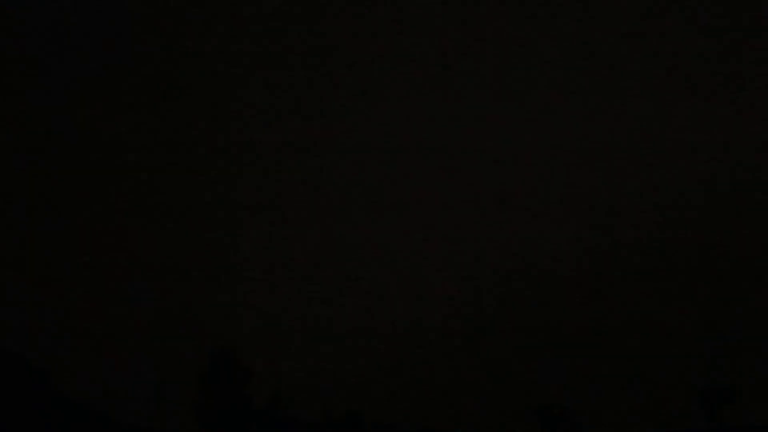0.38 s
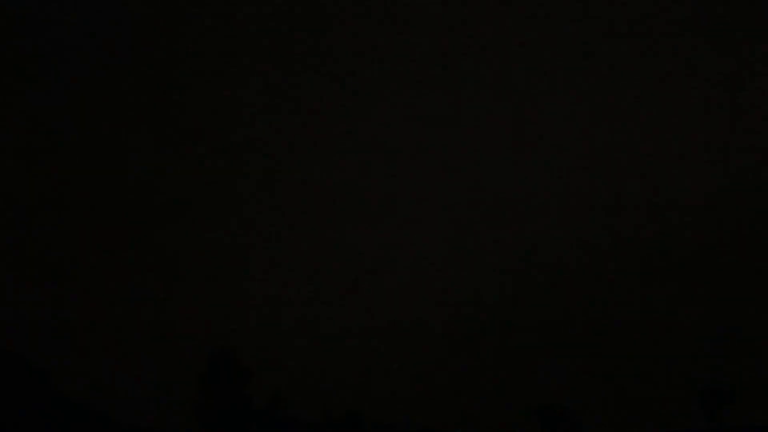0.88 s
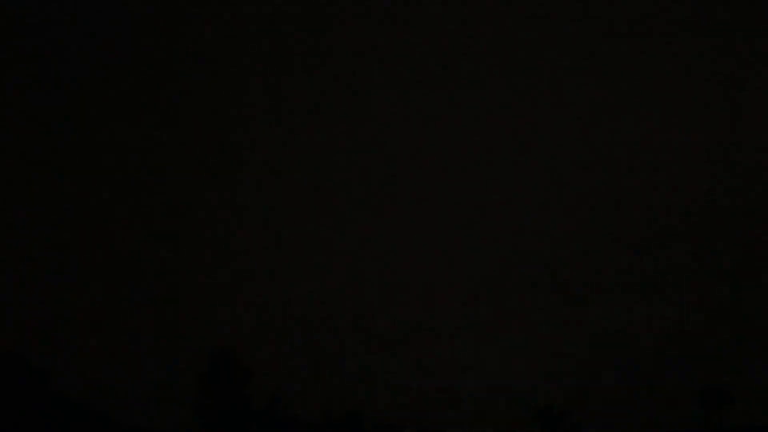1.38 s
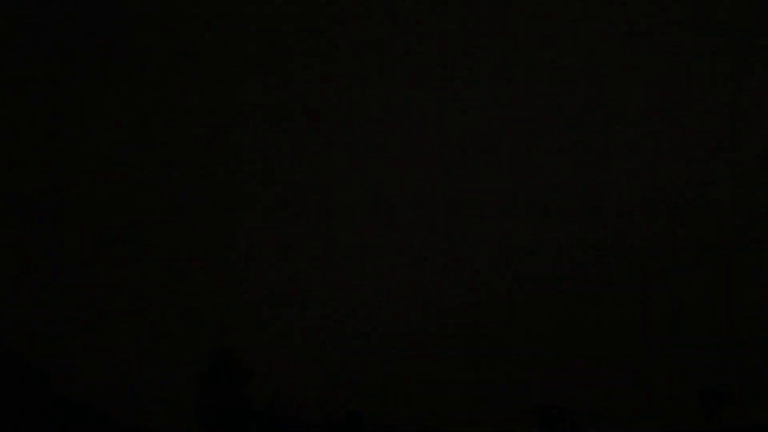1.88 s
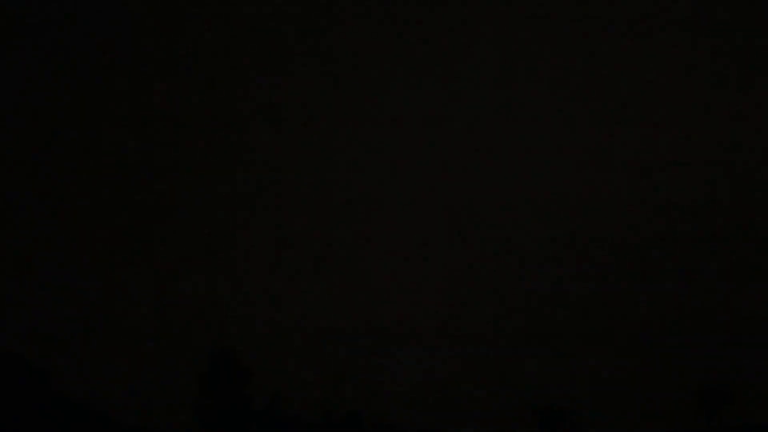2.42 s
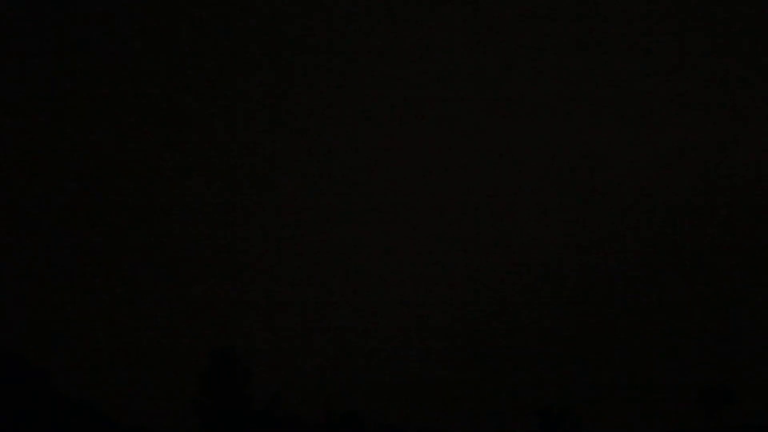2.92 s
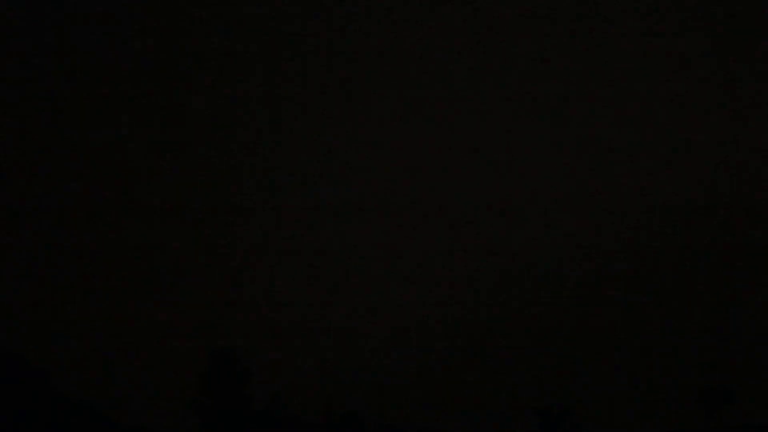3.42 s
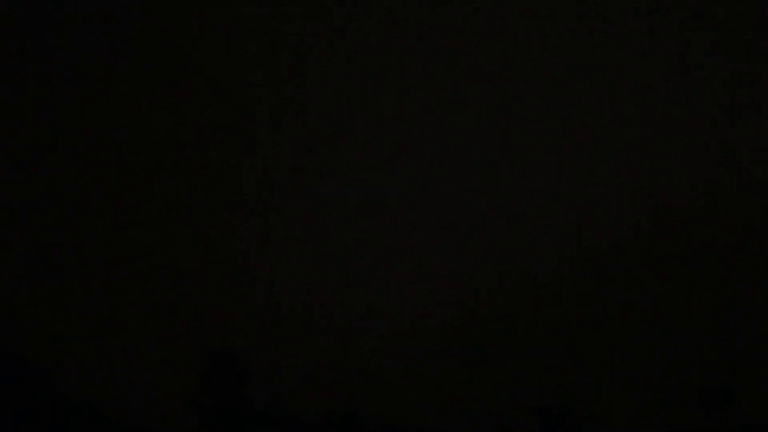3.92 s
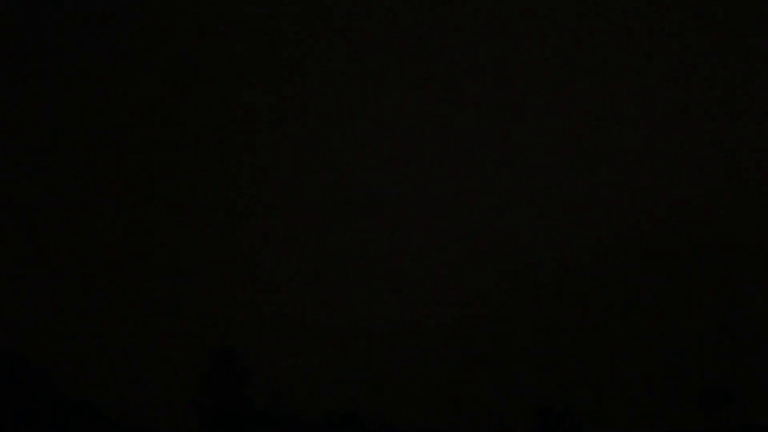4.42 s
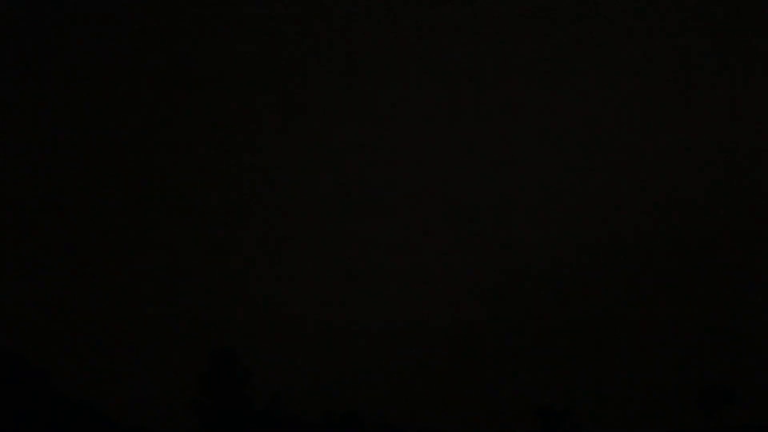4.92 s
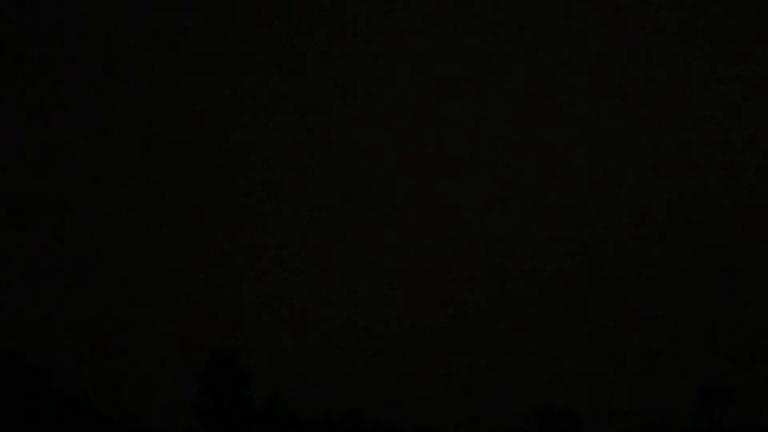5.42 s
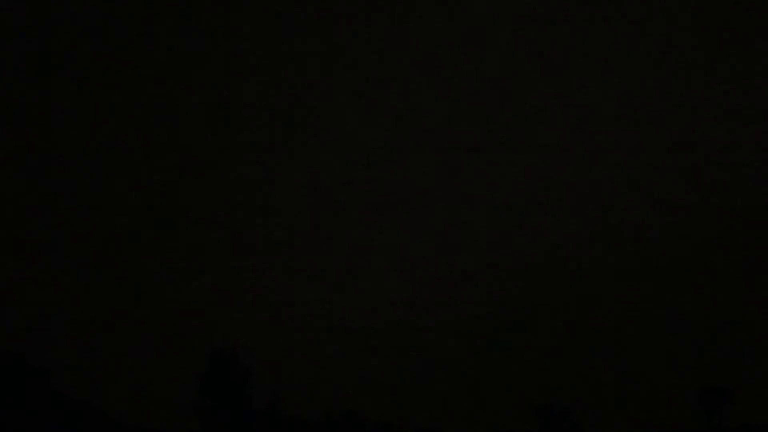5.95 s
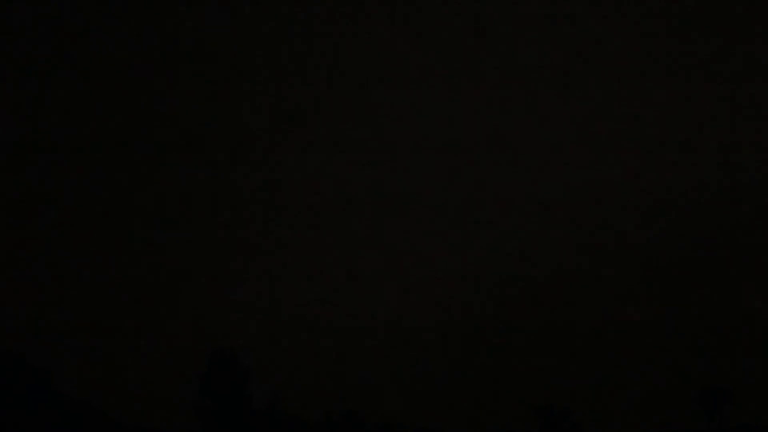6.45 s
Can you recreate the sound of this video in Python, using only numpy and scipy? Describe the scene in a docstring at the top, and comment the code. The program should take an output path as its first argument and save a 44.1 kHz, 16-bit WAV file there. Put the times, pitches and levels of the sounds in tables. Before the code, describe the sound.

Outdoors at night near a road, a cricket chirps close by in fast, almost unbroken pulses with a fainter insect trill above. One engine hums low and steady; another idles, revs up and fades by three seconds. Early on, a dozen soft distant booms tumble together over a low roll. Far traffic rumbles throughout, heard from one fixed mono microphone.

```python
"""A night outdoors near a road. From the start one engine cruises while another idles, pulls away and fades,
both as harmonic orders of the cycle rate, over far traffic and night air made of filtered noise.
A cricket chirps close by in gliding wing strokes and a second insect trills above it.
Soon faint tones begin to glide and a cluster of distant booms, each a push and a suction, rolls in.
The engine left cruising, the traffic and the insects go on to the end, with one more faint glide late on."""
import sys
import numpy as np
from scipy import signal
from scipy.fft import rfft, irfft
from scipy.io import wavfile

SR = 44100
rng = np.random.default_rng(int(sys.argv[2]) if len(sys.argv) > 2 else 0)


def transcribe(signal):
    """Save signal, clipped to [-1, 1], as a 16-bit WAV file at the path in sys.argv[1]."""
    frames = np.atleast_2d(signal).T
    limited = np.clip(frames, -1, 1)
    pcm = np.round(limited * 32767).astype(np.int16)
    wavfile.write(sys.argv[1], SR, pcm)


N = 289737   # length [samples]


def from_db(db):
    """Decibel law: 20 dB is a tenfold amplitude."""
    return 10 ** (np.asarray(db, float) / 20)


def rms_one(x):
    """Normalisation: equal mean power, rms 1."""
    return x / np.sqrt(np.mean(x ** 2) + 1e-20)


def in_time(rows):
    """Linear interpolation: one value per sample for each column after the time."""
    s, *columns = np.transpose(rows)
    return [np.interp(np.arange(N) / SR, s, column) for column in columns]


def drift(rate):
    """Low-pass random process: two equal poles at rate [Hz] leave slow chance of rms 1."""
    step = 40   # samples between computed values
    r = np.exp(-2 * np.pi * rate * step / SR)
    white = rng.standard_normal(N // step + 2002)
    slow = signal.lfilter([1], [1, -2 * r, r * r], white)[2000:]   # the filter has settled
    return np.interp(np.arange(N) / step, np.arange(len(slow)), rms_one(slow))


def swell(s, fall_s, db):
    """Gaussian envelope: tops at s and is about 9 dB down fall_s before and after."""
    return from_db(db) * np.exp(-((np.arange(N) / SR - s) / fall_s) ** 2)


def coloured(spectrum, patchy_db):
    """Spectral shaping: noise in overlapping bands half an octave apart, each flickering alone; rms 1."""
    hz = np.maximum(np.fft.rfftfreq(N, 1 / SR), 1)
    point_hz, point_db = np.transpose(spectrum)
    response = from_db(np.interp(np.log(hz), np.log(point_hz), point_db))
    shaped = rfft(rng.standard_normal(N)) * response
    octave, out = np.log2(hz), 0
    for centre in np.arange(np.log2(point_hz[0]) - 1, np.log2(point_hz[-1]) + 1, .5):
        band = np.clip(1 - 2 * np.abs(octave - centre), 0, 1)
        out = out + irfft(shaped * band, N) * from_db(patchy_db * drift(5.1))
    return rms_one(out)


def engine(rate_hz, orders, order_db, upper_db, waver, flutter_db):
    """Harmonic orders: exhaust tones on multiples of the cycle rate; the air path makes each waver and flutter."""
    phase, out = 2 * np.pi * np.cumsum(rate_hz) / SR, 0
    for k, (multiple, db) in enumerate(zip(orders, order_db)):
        above_first_db = upper_db if k > 0 else 0
        gain = from_db(db + above_first_db + flutter_db * drift(2.4))
        tone_phase = multiple * phase + waver * drift(2.54) + 2 * np.pi * rng.random()   # [rad]
        out = out + gain * np.sin(tone_phase)
    return np.sqrt(2) * out   # a sine of unit gain gets rms 1


# cruising engine: (time [s], cycle rate [Hz], level [dB])
CRUISE = [(0, 39.17, -41.5), (1, 39.97, -38.5), (2, 40.37, -40.5), (2.6, 40.44, -36), (3.3, 41.05, -34),
          (4, 41.91, -35), (4.7, 42.47, -34), (5.2, 42.6, -41), (5.8, 41.85, -42), (6.57, 41.9, -45)]
# its tones: (multiple of the cycle rate), and for each (relative level [dB])
CRUISE_ORDERS = [3, 4, 5, 6, 7, 10]
CRUISE_ORDER_DB = [-2, -14, 0, -13, -12, -18]


def cruising():
    """Harmonic orders at nearly constant speed: the cycle rate creeps up, then eases."""
    rate_hz, db = in_time(CRUISE)
    return from_db(db) * engine(rate_hz, CRUISE_ORDERS, CRUISE_ORDER_DB, 0, waver=.3, flutter_db=.9)


# engine that pulls away: (time [s], cycle rate [Hz], level [dB], throttle [0-1])
PULL = [(0, 59.84, -31.5, 0), (.5, 60.5, -30.5, 0.33), (1, 60.55, -28, 0.37), (1.4, 60.07, -31.5, 0.45),
        (1.7, 59.72, -33, 0.63), (2.0, 61.7, -26, 0.47), (2.2, 64.1, -30.5, 0.48),
        (2.35, 67.8, -29.5, 0.79), (2.55, 68.5, -35.5, 1), (2.75, 70.13, -40, 0.93), (3.0, 71.37, -50, 0.7),
        (3.4, 69.3, -53, 0.5)]
# its tones: (multiple of the cycle rate), and for each (relative level at full throttle [dB])
PULL_ORDERS = [2, 4, 5, 6, 7, 9, 10]
PULL_ORDER_DB = [0, -3, -9, -14, -13, -11, -20]


def pulling_away():
    """Load-dependent harmonics: opening the throttle brings out the orders above the first listed."""
    rate_hz, db, throttle = in_time(PULL)
    upper_db = -22 * (1 - np.clip(throttle, 0, 1))
    return from_db(db) * engine(rate_hz, PULL_ORDERS, PULL_ORDER_DB, upper_db, waver=.35, flutter_db=1.5)


# far motors swelling and fading:
# (time of maximum [s], time to fall 9 dB [s], frequency [Hz], bandwidth [Hz], level at maximum [dB])
DRONE_SWELLS = [(0, 0.34, 109.4, 4.3, -31), (0, 1.16, 143.3, 5, -36), (1.3, 2, 47.6, 3.5, -37),
                (2.5, 1, 124.8, 7.5, -32.5), (4.2, 0.34, 107.7, 4.1, -31), (4.5, 1.17, 46.5, 3.5, -35.5),
                (5.2, 1.65, 141.3, 4.8, -34.5), (5.5, 0.43, 104.5, 6.8, -34.5), (5.9, 1.14, 123.3, 7, -31),
                (6.57, .5, 109.5, 2.9, -29)]


def drones():
    """Resonant filtering: many motors near one speed blur into narrow bands of noise."""
    out = 0
    for s, fall_s, hz, width_hz, db in DRONE_SWELLS:
        r = np.exp(-np.pi * width_hz / SR)
        poles = [1, -2 * r * np.cos(2 * np.pi * hz / SR), r * r]
        ringing = signal.lfilter([1, 0, -1], poles, rng.standard_normal(N + SR // 2))
        out = out + swell(s, fall_s, db) * rms_one(ringing[SR // 2:])
    return signal.sosfilt(signal.butter(4, 250, fs=SR, output="sos"), out)


# density of far traffic: (time [s], relative level [dB])
TRAFFIC = [(0, 0), (.5, 1), (1.3, 1), (2, -0.5), (2.9, 0.5), (3.6, -2), (4.8, 1), (5.6, -0.5), (6.57, 3.5)]
# spectra of rumble, growl and tyre roar: (frequency [Hz], relative density [dB per Hz])
RUMBLE = [(13, -42), (22, -14), (65, -2.5), (113, 2), (135, -12.5), (170, -5.5), (220, -20.5), (370, -120)]
GROWL = [(88, -42), (150, -2.5), (167, -4.5), (215, -1), (280, -6), (520, -14.5), (680, -36), (1140, -120)]
ROAR = [(260, -53), (450, -10.5), (625, -6), (893, -6.5), (1460, -9), (2150, -18.5), (4000, -33),
        (5200, -51), (8800, -120)]
# single cars passing far off: (time nearest [s], time to fall 9 dB [s], roar level when nearest [dB])
PASSES = [(0, .5, -44), (2.3, 0.92, -42), (5.2, 0.93, -45.5), (6.5, 0.6, -45.5)]
# low roll under the booms: (begins [s], full [s], holds until [s], gone [s])
ROLL_S = (.55, .75, 1.35, 1.9)


def traffic():
    """Incoherent power addition: density drives rumble and growl, booms add a low roll, passing cars tyre roar."""
    density_db, = in_time(TRAFFIC)
    roll = from_db(-27.5) * np.interp(np.arange(N) / SR, ROLL_S, [0, 1, 1, 0])
    rumble = np.hypot(from_db(-33.5 + 1.2 * density_db), roll)   # 1.2 times the swing in density
    growl = from_db(-36 + density_db)
    passing_power = sum(swell(*row) ** 2 for row in PASSES)
    roar = np.sqrt(from_db(-41.5) ** 2 + passing_power)
    out = rumble * coloured(RUMBLE, patchy_db=1.9)
    out = out + growl * coloured(GROWL, patchy_db=0.4)
    return out + roar * coloured(ROAR, patchy_db=0.53)


# spectrum of the night air: (frequency [Hz], relative density [dB per Hz])
AIR = [(1500, -12), (2500, -1), (3400, -4.5), (4180, -3.5), (6230, -11), (7100, -6.5), (8000, -8.5),
       (8650, -15.5), (9200, -6.5), (9900, -7.5), (10400, -20.5), (13000, -27), (15000, -31), (15600, -48)]


def night_air():
    """Broadband noise: a faint shaped hiss whose bands flicker slightly."""
    return from_db(-54) * coloured(AIR, patchy_db=0.7)


# faint whines: (frequency [Hz], middle level [dB])
WHINES = [(2416, -72), (3427, -72), (3527, -73), (11009, -94)]


def whines():
    """Slow modulation: thin high tones waver a little in level and phase."""
    t, out = np.arange(N) / SR, 0
    for hz, db in WHINES:
        out = out + from_db(db + 5.2 * drift(0.91)) * np.sin(2 * np.pi * hz * t + drift(2.3))
    return out


# trilling insect: (time [s], relative level [dB])
TRILL = [(0, -75), (.6, -66), (1.4, -83), (2, -65), (3.5, -67.5), (5.1, -64.5), (6.57, -64.5)]


def trill():
    """Frequency and amplitude modulation: each wing stroke arches up to its top pitch and down, unevenly."""
    strokes_per_s = 44.3
    db, = in_time(TRILL)
    cycles = np.arange(N) / SR * strokes_per_s - .11 + 0.041 * drift(10.14)
    turn = cycles % 1 - .5   # [cycles], 0 at the top of the arch
    hz = 9900 - 6200 * turn ** 2 + 60 * drift(60.0)
    shape = np.clip(1 - (turn / 0.51) ** 2, 0, 1) * np.exp(-1.6 * turn)
    gain = from_db(db + 4.0 + 1.2 * drift(25.0))
    return gain * shape * np.sin(2 * np.pi * np.cumsum(hz) / SR)


# runs of nearly steady chirping, following on almost without pause:
# (first chirp [s], last chirp [s], level [dB])
RUNS = [(.0075, 0.625, -42.4), (.7232, 1.522, -42.9), (1.609, 2.845, -42.5), (2.939, 4.286, -43.5),
        (4.383, 5.525, -42.7), (5.629, 5.89, -43), (6.092, 6.4736, -43.6)]
# strokes of a chirp, before chance: (offset [ms], length [ms], start frequency [Hz], end frequency [Hz])
STROKES = [(-11.5, 6.6, 7580, 7230), (1.5, 9.2, 8140, 7520), (17, 11.4, 8140, 7520)]
# for each stroke: (mean level re the run [dB]), (random spread of level [dB])
STROKE_DB = [-8.5, -1.5, -0.5]
STROKE_SPREAD_DB = [2.5, 0.7, 0.2]


def cricket():
    """Stridulation: a faint opening stroke, then two wing strokes; pitch falls as the file is scraped."""
    chirp_s, jitter_s = .089, .0008   # usual spacing, random spread of timing
    falter_s = 5.805   # the chirp here breaks off before its last stroke
    lead = SR // 2   # room for strokes that begin before time zero
    out = np.zeros(N + SR)
    chirps = []
    for first, last, db in RUNS:
        count = round((last - first) / chirp_s) + 1   # a whole number of chirps fits each run
        chirps += [(s, db) for s in np.linspace(first, last, count)]
    chance = rng.standard_normal((len(chirps), 3, 5))
    for (s, run_db), luck in zip(chirps, chance):
        strokes = STROKES[:2] if abs(s - falter_s) < chirp_s / 2 else STROKES
        chirp_at = s + jitter_s * luck[0, -1]
        for stroke, db, spread_db, stroke_luck in zip(strokes, STROKE_DB, STROKE_SPREAD_DB, luck):
            offset_ms, ms, start_hz, end_hz = stroke
            length_luck, pitch_luck, phase_luck, level_luck, _ = stroke_luck
            u = np.linspace(0, 1, int(ms * (1 + .05 * length_luck) * SR / 1000))   # share of the stroke
            hz = (start_hz + (end_hz - start_hz) * u ** 1.3) * (1 + 0.0053 * pitch_luck)
            shape = np.minimum(1, u / 0.073) * np.minimum(1, (1 - u) / 0.24) * np.exp(-.7 * u)
            gain = from_db(run_db + db + spread_db * level_luck)
            at = lead + int((chirp_at + offset_ms / 1000) * SR)
            out[at:at + len(u)] += gain * shape * np.sin(2 * np.pi * np.cumsum(hz) / SR + 9 * phase_luck)
    out = out[lead:lead + N]
    t = np.arange(SR // 10) / SR
    leaves = rng.standard_normal(len(t)) * np.exp(-t / .025)   # scatter from foliage
    return out + from_db(-44.5) * signal.fftconvolve(out, leaves)[:N]


def insects():
    """Resonant radiation: wings radiate only near their resonance."""
    resonance = signal.butter(3, [6000, 10800], "band", fs=SR, output="sos")
    return signal.sosfilt(resonance, trill() + cricket())


# brief thin tones:
# (start [s], end [s], start frequency [Hz], end frequency [Hz], level at the middle [dB])
GLIDES = [(.65, 1.06, 529, 555, -49), (1.3, 1.7, 535, 584, -45.5), (1.352, 1.473, 329, 327, -36.5),
          (6.1, 6.491, 466, 489, -46.5)]


def glides():
    """Linear frequency sweep: short faint tones fade in, glide, mostly upward, and fade out."""
    out = np.zeros(N)
    for start, end, start_hz, end_hz, db in GLIDES:
        at, count = int(start * SR), int((end - start) * SR)
        phase = 2 * np.pi * np.cumsum(np.linspace(start_hz, end_hz, count)) / SR
        out[at:at + count] += from_db(db) * np.sqrt(2 * np.hanning(count)) * np.sin(phase)
    return out


# distant booms, before echoes and band-pass:
# (time [s], push peak [dB], push length [ms], suction length [ms], suction over push [ratio])
BOOMS = [(.711, -14, 5, 3.9, 1.1), (0.842, -18, 2.4, 2.9, 0.99), (.884, -14.5, 2.4, 4.5, 0.94),
         (.954, -17.5, 4.1, 4.2, 1.3), (1.0259, -9, 2, 2.7, 1.2), (1.0613, -8, 2.7, 6, 0.36),
         (1.194, -14.5, 3.5, 3.8, 2.04), (1.303, -15, 3.8, 5, 1.3), (1.354, -11, 1.9, 6.3, 1.2),
         (1.387, -16, 4.2, 4.9, 1.3), (1.496, -14.5, 4.7, 8.8, 0.48), (1.609, -12.5, 2.9, 5.8, .35)]


def booms():
    """Pressure pulse and scattering: one push and one suction, rounded by distance, trailed by echoes."""
    out = np.zeros(N)
    for s, db, push_ms, suction_ms, suction in BOOMS:
        push = np.sin(np.linspace(0, np.pi, int(push_ms * SR / 1000)))
        pull = np.sin(np.linspace(0, np.pi, int(suction_ms * SR / 1000)))
        wave = np.concatenate([push, -suction * pull])
        at = int(s * SR)
        out[at:at + len(wave)] += from_db(db) * wave
    t = np.arange(SR // 4) / SR
    echoes = rng.standard_normal(len(t)) * np.exp(-t / 0.023) * (t > .012)   # none before 12 ms
    out += from_db(-50) * signal.fftconvolve(out, echoes)[:N]
    return signal.sosfilt(signal.butter(3, [30, 460], "band", fs=SR, output="sos"), out)


def scene():
    """Superposition: the pressures of all sources add at one microphone."""
    road = cruising() + pulling_away() + drones() + traffic()
    night = night_air() + whines() + insects()
    return (road + night + glides() + booms())[None]   # one channel


def band_limit(x):
    """A steep low-pass at the top of the band."""
    return signal.sosfilt(signal.butter(12, 15590, fs=SR, output="sos"), x)


def record(dry):
    """Superposition is complete here: the dry sum is the finished mix."""
    return band_limit(dry)


dry = scene()
out = record(dry)
transcribe(out)
```